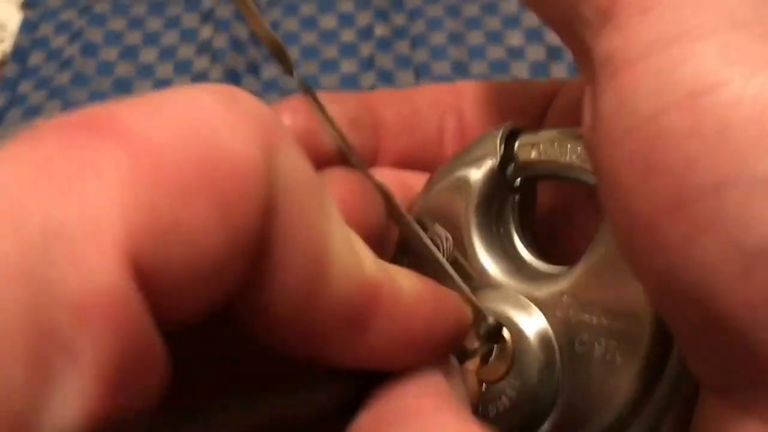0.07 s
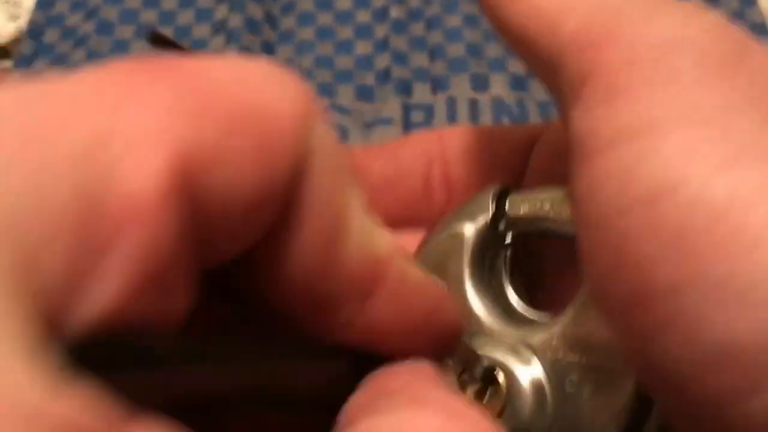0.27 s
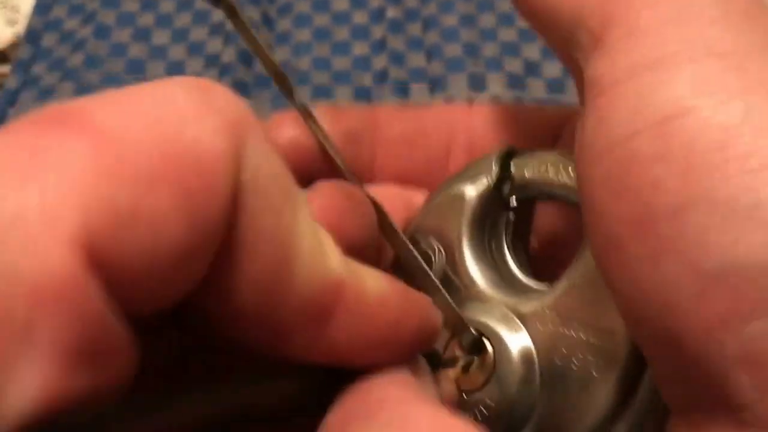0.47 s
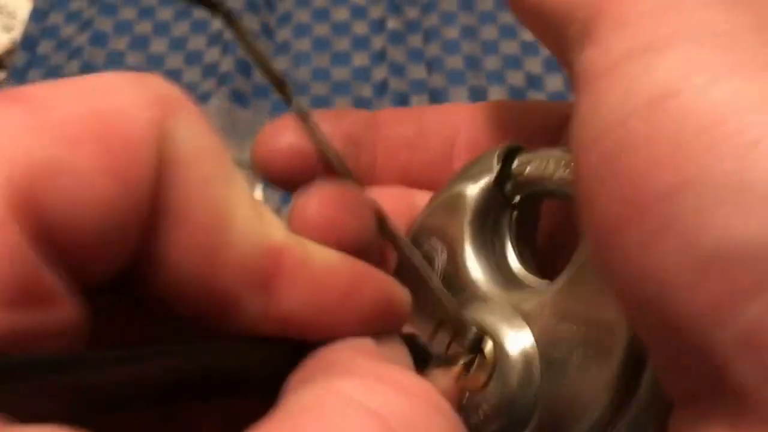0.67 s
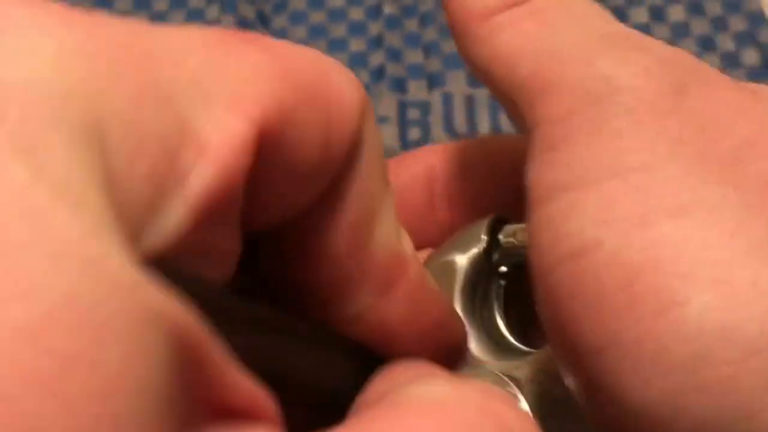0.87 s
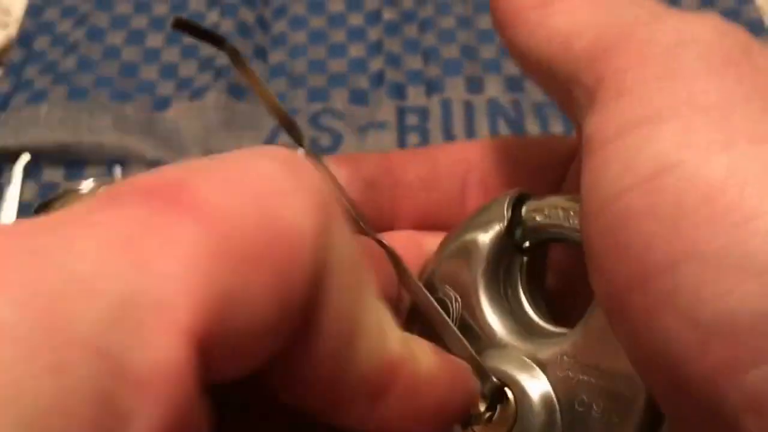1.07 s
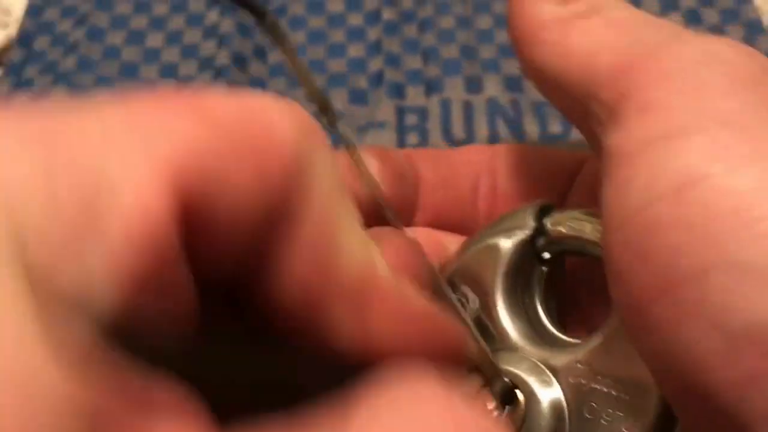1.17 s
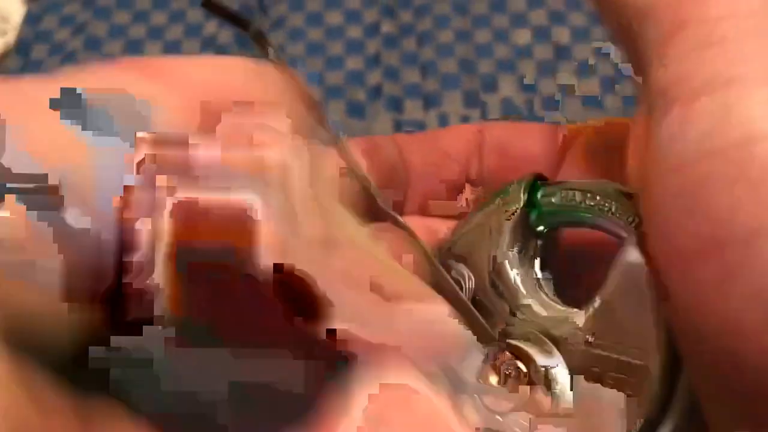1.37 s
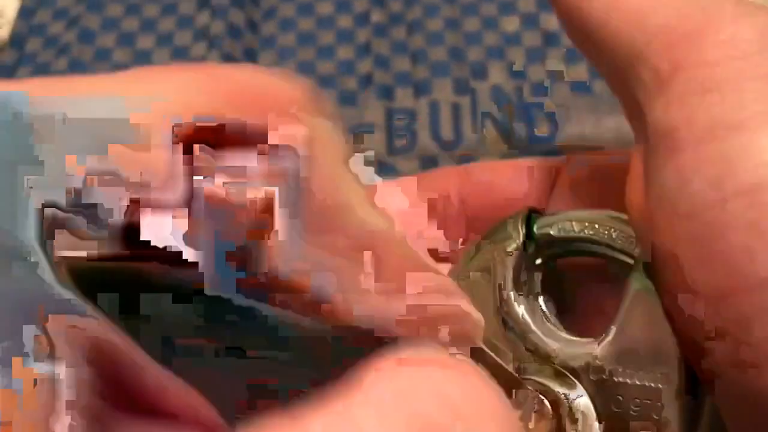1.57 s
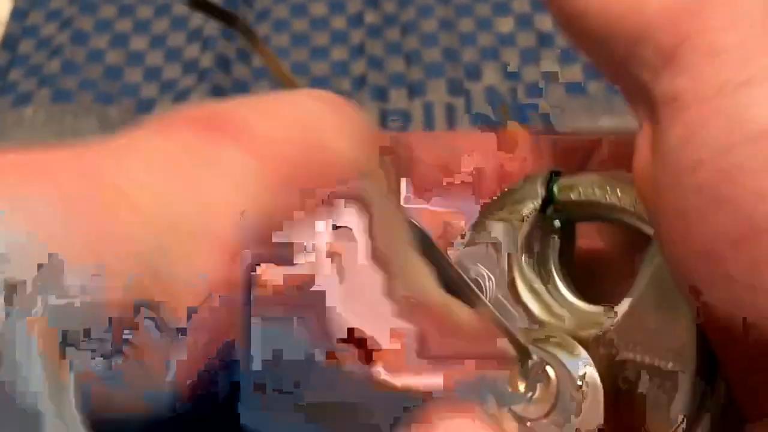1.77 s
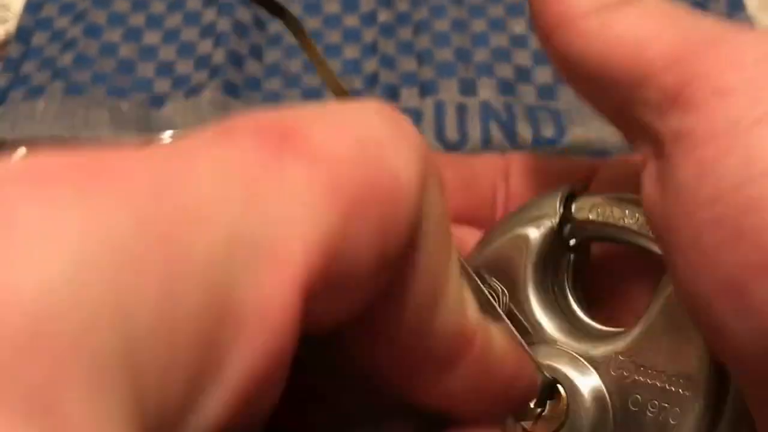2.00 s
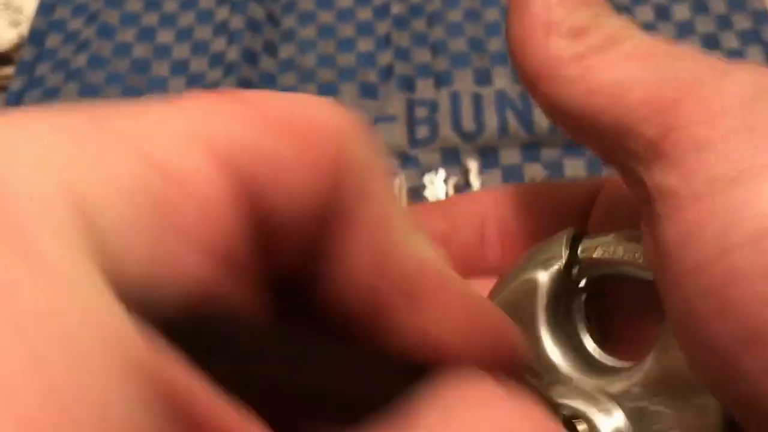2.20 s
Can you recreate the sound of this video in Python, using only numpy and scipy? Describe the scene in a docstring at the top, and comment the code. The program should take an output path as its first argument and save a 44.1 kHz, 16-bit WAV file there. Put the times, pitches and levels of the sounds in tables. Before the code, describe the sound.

Lock picking in a steel padlock held in the hand: faint ticks first, then louder bunches of dry metal clicks with four sharp snaps, tiny scrapes and soft thumps, very close microphone in a quiet small room.

```python
"""In a small room, a pick is worked back and forth in a steel padlock held in the hand, close to the microphone.
Pins click dryly in quick bunches, made of short noise and contact pulses through damped resonances.
Trains of tiny slips make faint scrapes along the keyway, and the lock thumps softly against the hand.
Four hard snaps ring the thin steel as fluttering sine modes. Shaped noise gives room rumble and hiss,
and a reverb of scattered reflections with a weak tail surrounds the picking."""
import sys
import numpy as np
from scipy import signal
from scipy.fft import rfft, irfft
from scipy.io import wavfile

SR = 44100
rng = np.random.default_rng(int(sys.argv[2]) if len(sys.argv) > 2 else 0)


def pcm_store(signal):
    """Save signal as 16-bit PCM."""
    levels = np.round(np.clip(np.atleast_2d(signal), -1, 1) * 32767)
    wavfile.write(sys.argv[1], SR, levels.astype(np.int16).T)


N = 98739  # length in samples


def amp(db):
    """Turns decibels into gain."""
    return 10 ** (np.asarray(db) / 20)


def unit(x):
    """Scales a sound to rms 1."""
    return x / np.sqrt(np.mean(x ** 2) + 1e-20)


def read(points, hz):
    """Reads a frequency table on a log-frequency axis."""
    table_hz, value = np.transpose(points)
    return np.interp(np.log(hz + 1), np.log(table_hz), value)


def add(mix, start_s, sound):
    """Mixes a sound in at a time."""
    part = mix[max(round(start_s * SR), 0):][:len(sound)]
    part += sound[:len(part)]


def colour(x, points):
    """Multiplies the spectrum by a curve in dB, then scales to rms 1."""
    gain = amp(read(points, np.fft.rfftfreq(len(x), 1 / SR)))
    return unit(irfft(rfft(x) * gain, len(x)))


def resonate(x, hz, width_hz):
    """Applies one resonance twice, for steep skirts."""
    b, a = signal.iirpeak(hz, hz / width_hz, SR)
    once = signal.lfilter(b, a, x)
    return signal.lfilter(b, a, once)


SOFT_HZ = 8330  # the heavy body and the reflections from the hands lose the treble above this


def soften(x):
    """Takes the top treble away with a low-pass."""
    return signal.sosfilt(signal.butter(3, SOFT_HZ, fs=SR, output="sos"), x)


# Spectrum of the low room rumble. Each row: frequency in Hz, relative level in dB per Hz.
RUMBLE_COLOUR = [(20, -49), (50, -5.5), (100, -2.5), (220, -5.5), (450, -10), (900, -24), (2500, -53)]
# Loudness of the rumble. Each row: time in seconds, rms level in dB.
RUMBLE_LEVEL = [(0, -70.5), (.75, -70), (.95, -66.5), (1.3, -65.5), (1.52, -68), (1.8, -67.5)]
# Spectrum of the soft hiss. Each row: frequency in Hz, relative level in dB per Hz.
HISS_COLOUR = [(100, 9), (600, 3), (1100, 3.5), (3300, 2), (7000, -3), (16000, -6.5)]
# Loudness of the hiss. Each row: time in seconds, rms level in dB.
HISS_LEVEL = [(0, -70), (.74, -71), (.89, -68.5), (.92, -60.5), (1.37, -61), (1.388, -73.5), (1.425, -60),
              (1.455, -60.5), (1.85, -61.5), (2.24, -60.5)]


def background():
    """Shaped noise: a low rumble, and a hiss that steps up near 0.9 s and dips briefly near 1.39 s."""
    t = np.arange(N) / SR
    out = np.zeros(N)
    for spectrum, level in ((RUMBLE_COLOUR, RUMBLE_LEVEL), (HISS_COLOUR, HISS_LEVEL)):
        level_db = np.interp(t, *np.transpose(level))
        out += colour(rng.standard_normal(N), spectrum) * amp(level_db)
    return out


# The four resonances of a click: centre Hz, width Hz, decay s, and the share of a wide skirt.
# The body's centre comes from each click.
KNOCK_HZ, KNOCK_WIDTH_HZ, KNOCK_S, KNOCK_SKIRT, KNOCK_SKIRT_WIDTH_HZ = 1114, 524, 0.0011, 0.33, 1660
BODY_WIDTH_HZ, BODY_S, BODY_SKIRT, BODY_SKIRT_WIDTH_HZ = 560, 0.0012, 0.61, 3210
EDGE_HZ, EDGE_WIDTH_HZ, EDGE_S = 7970, 6130, 0.0012
TICK_HZ, TICK_WIDTH_HZ, TICK_S = 12700, 4200, 0.00052
TICK_LOW, TICK_HIGH = 0.655, 1.15  # each click's tick sits at a slightly different pitch, times TICK_HZ
CONTACT = 4.6  # contact pulse against the noise of the rattle
RISE_S = 0.000215  # the click's noise rises softly, and the contact pulse lands at the top
SWELL_DB, SWELL_S = -5, 0.00021  # a faint, very short swell of noise leading into each click
LEAD_S, LEVEL_S = 0.002, 0.0025  # time kept for the swell, and the stretch after it that sets the level
AFTER_DB, AFTER_S = [-6.5, -14.5, -33, -15], 0.0036  # the lock's short after-ring in knock, body, edge, tick


def click(body_hz, levels_db):
    """A contact pulse and a very short rattle of noise excite four heavily damped resonances."""
    time = np.arange(2048) / SR - LEAD_S
    rise = np.clip(time / RISE_S, 0, 1)
    swell = amp(SWELL_DB) * np.exp(-abs(time) / SWELL_S)
    noise = rng.standard_normal((4, len(time))) * np.maximum(rise, swell)
    contact = CONTACT * (np.arange(len(time)) == round((LEAD_S + RISE_S) * SR))

    t = np.maximum(time, 0)
    strikes = []
    for rattle, decay, after_db in zip(noise, (KNOCK_S, BODY_S, EDGE_S, TICK_S), AFTER_DB):
        envelope = np.exp(-t / decay) + amp(after_db) * np.exp(-t / AFTER_S)
        strikes.append(rattle * envelope + contact)
    knock, body, edge, tick = strikes

    knock_skirt = KNOCK_SKIRT * resonate(knock, KNOCK_HZ, KNOCK_SKIRT_WIDTH_HZ)
    body_skirt = BODY_SKIRT * resonate(body, body_hz, BODY_SKIRT_WIDTH_HZ)
    tick_hz = TICK_HZ * rng.uniform(TICK_LOW, TICK_HIGH)
    parts = [resonate(knock, KNOCK_HZ, KNOCK_WIDTH_HZ) + knock_skirt,
             soften(resonate(body, body_hz, BODY_WIDTH_HZ) + body_skirt),
             resonate(edge, EDGE_HZ, EDGE_WIDTH_HZ),
             resonate(tick, tick_hz, TICK_WIDTH_HZ)]
    out = np.zeros(len(t))
    for part, db in zip(parts, levels_db):
        head = part[round(LEAD_S * SR):][:round(LEVEL_S * SR)]
        out += amp(db) * part / head.std()
    return out


# The pick striking pins, levels ahead of the case. Each row: start in seconds, body pitch in Hz,
# dull knock in dB, body in dB, bright edge in dB, thin tick in dB.
PIN_CLICKS = [(0.0222, 2680, -53.5, -46, -54, -52), (0.109, 3100, -46.5, -50.5, -67, -69),
              (0.2228, 4200, -53.5, -47, -57, -78), (0.2657, 2980, -52, -51.5, -60, -67),
              (0.271, 3600, -57, -50.5, -67, -56), (0.3367, 4580, -61, -49, -45, -47),
              (0.4423, 5500, -50, -44, -57, -45.5), (0.445, 3880, -76, -38, -40.5, -45.5),
              (0.6096, 2940, -58, -45, -64, -56), (0.6146, 3070, -57.5, -35.5, -43.5, -50.5),
              (0.7613, 2800, -52.5, -38, -35, -54), (0.8092, 3380, -54, -21.5, -60, -53),
              (0.8304, 3900, -79, -37, -42, -65), (0.8984, 3200, -47, -27, -27.5, -37),
              (0.903, 3640, -32.5, -45, -40, -26.5), (0.9124, 3380, -35.5, -25, -40.5, -57.0),
              (0.922, 3970, -46, -29.5, -26, -47), (0.9748, 2060, -51, -34, -37, -27),
              (1.1169, 4200, -47, -35, -41, -37.5), (1.1201, 5600, -44.5, -38, -35, -45),
              (1.1248, 4400, -45, -27, -40, -56), (1.13, 3120, -43.5, -25.5, -22.5, -53),
              (1.1345, 4200, -42, -26.5, -25, -54), (1.1383, 4310, -47, -29, -30.5, -54),
              (1.1451, 3050, -49.5, -34.5, -35, -62.0), (1.3244, 3370, -64, -66, -48, -60),
              (1.3392, 4000, -48, -43.5, -50.5, -56), (1.4219, 4130, -56, -44, -54, -68),
              (1.438, 3640, -51.5, -45, -40, -30.5), (1.4507, 3760, -44, -24.5, -43, -58),
              (1.4525, 4540, -40.5, -21.5, -21, -43), (1.4558, 4420, -59, -24.5, -30, -37),
              (1.5683, 4100, -55.5, -49.5, -38.5, -50), (1.6357, 3670, -56, -45.5, -56, -65),
              (1.6539, 3420, -42, -34, -33.5, -22.5), (1.6716, 4380, -62, -33, -38.5, -58),
              (1.7458, 3150, -57, -42.5, -51, -66), (1.7733, 4080, -35, -29.5, -29.0, -18.5),
              (1.7824, 4340, -58, -28.5, -36, -41), (1.783, 4390, -38, -19, -22, -29),
              (1.807, 2950, -43.5, -34.0, -37, -71), (2.057, 3760, -46.5, -42.5, -58, -43.5),
              (2.065, 4200, -53, -44.5, -44.5, -35.5), (2.0858, 2760, -56, -45.5, -69, -66.0),
              (2.1985, 4350, -62, -47.5, -48.5, -55.5), (2.22, 4450, -47.5, -28.5, -35, -51),
              (2.2283, 3420, -49.5, -33, -39, -66), (2.2332, 4170, -42, -36, -28, -26)]


def pins():
    """The pick strikes the pins, one damped click for each contact."""
    out = np.zeros(N)
    for start_s, body_hz, *levels_db in PIN_CLICKS:
        add(out, start_s - LEAD_S, click(body_hz, levels_db))
    return out


# Peaks and hollows of the lock's case, shared by all clicks and scrapes.
# Each row: frequency in Hz, gain in dB.
CASE_COLOUR = [(1300, -1.5), (1900, 0.5), (4500, 1), (5200, -1), (6000, 0.5), (7300, -1.5), (8500, 0),
               (9500, -0.5), (10500, -8), (12000, 3), (14400, -2), (15400, 3.5)]


def case(x):
    """The steel case colours every contact by a minimum-phase filter, so no sound comes ahead of it."""
    log_gain = np.log(amp(read(CASE_COLOUR, abs(np.fft.fftfreq(2048, 1 / SR)))))
    spectrum = np.exp(np.conj(signal.hilbert(log_gain)))
    return signal.fftconvolve(x, np.fft.ifft(spectrum).real)[:N]


# How long the room's tail lasts. Each row: frequency in Hz, time to fall 60 dB in seconds.
ROOM_T60 = [(1500, 0.08), (4500, 0.25), (14000, 0.35)]
# Colour of the room's tail. Each row: frequency in Hz, relative level in dB.
TAIL_COLOUR = [(1000, 6.5), (4200, 0), (5200, -20), (6000, 3), (7200, -9), (9000, -3), (12000, -12)]
TAIL_DB, EARLY_DB, EARLY_S = -23.5, -19.5, 0.014  # energy of tail and reflections, reflections' decay


def room(x):
    """Quick reflections from hands and table, with a weak noise tail whose bass dies first."""
    t = np.arange(SR // 2) / SR
    hz, frames, bins = signal.stft(rng.standard_normal(len(t)), SR, nperseg=256)
    fall_db = 60 * frames / read(ROOM_T60, hz)[:, None]
    fade = amp(read(TAIL_COLOUR, hz)[:, None] - fall_db)
    tail = signal.istft(bins * fade, SR, nperseg=256)[1][:len(t)]
    tail = tail * np.minimum(t / 0.005, 1)

    hits = rng.random(len(t)) < 2000 / SR  # 2000 reflections a second on average
    early = rng.standard_normal(len(t)) * hits * np.exp(-t / EARLY_S) * (t > 0.001)
    early = soften(early)

    echo = amp(TAIL_DB) * tail / np.linalg.norm(tail)
    echo = echo + amp(EARLY_DB) * early / np.linalg.norm(early)
    return signal.fftconvolve(x, echo)[:N]


# The pick dragging in the keyway, levels ahead of the case.
# Each row: start in seconds, length in seconds, rms level in dB, resonance in Hz.
KEYWAY_SCRAPES = [(0.076, 0.024, -61, 3140), (0.203, 0.011, -48.5, 2240), (0.369, 0.032, -62.5, 3400),
                  (0.776, 0.03, -51.5, 3060), (0.814, 0.04, -56.5, 3340), (1.295, 0.011, -50, 980),
                  (1.308, 0.014, -54.5, 4340), (1.641, 0.012, -48, 3100), (1.907, 0.035, -53.5, 2730)]
# Spectrum of the dragging. Each row: frequency in Hz, relative level in dB.
DRAG_COLOUR = [(300, -2), (1000, 4.5), (3500, 4), (6000, -0.5), (16000, -12.5)]
SLIPS_PER_S, SLIP_SPREAD_DB = 1500, 6
SCRAPE_WIDTH_HZ, SCRAPE_RING = 900, 0.55  # the stirred resonance and its share against the drag


def scrapes():
    """Dense tiny slips of uneven size swell and fade as the pick drags, stirring one resonance of the lock."""
    out = np.zeros(N)
    for start_s, length_s, db, hz in KEYWAY_SCRAPES:
        n = round(length_s * SR)
        moments = rng.random(n) < SLIPS_PER_S / SR
        sizes = amp(SLIP_SPREAD_DB * rng.standard_normal(n))
        slips = moments * sizes * rng.choice([-1, 1], n)
        resonance = unit(resonate(slips, hz, SCRAPE_WIDTH_HZ))
        drag = colour(slips, DRAG_COLOUR) + SCRAPE_RING * resonance
        swell = np.sin(np.pi * np.arange(n) / n) ** 0.5
        add(out, start_s, amp(db) * unit(drag * swell))
    return out


# Soft knocks of the lock against the hand.
# Each row: start in seconds, frequency in Hz, level in dB, decay in seconds.
HAND_THUMPS = [(0.449, 71, -50.5, 0.017), (0.463, 508, -52, 0.0064), (0.6, 90, -44, 0.0073),
               (0.81, 74, -38.5, 0.0092), (0.904, 68, -34.5, 0.0074), (1.115, 67, -43.5, 0.012),
               (1.439, 65, -42, 0.0089), (1.456, 508, -53.5, 0.013)]


def thumps():
    """The lock rocks against the hand: a short decaying sine that rises over its first cycle."""
    out = np.zeros(N)
    t = np.arange(SR // 6) / SR
    for start_s, hz, db, decay in HAND_THUMPS:
        envelope = np.minimum(t * hz, 1) * np.exp(-t / decay)
        add(out, start_s, amp(db) * envelope * np.sin(2 * np.pi * hz * t))
    return out


BUZZ, BUZZ_HZ = 0.3, 130  # depth and top speed of the ring's flutter as the steel chatters in the keyway


def ring(modes, t):
    """Sums decaying sine modes, each fluttering on its own by slow noise in level and phase."""
    out = np.zeros(len(t))
    slow = signal.butter(2, BUZZ_HZ, fs=SR, output="sos")
    for hz, db, t60 in modes:
        in_phase, across = signal.sosfilt(slow, rng.standard_normal((2, len(t))))
        phase = 2 * np.pi * (hz * t + rng.random())
        wave = (1 + BUZZ * unit(in_phase)) * np.sin(phase) + BUZZ * unit(across) * np.cos(phase)
        out += amp(db - 60 * t / t60) * wave
    return out


# Snaps that ring the steel. Each row: start in seconds, tension tool level in dB, pick level in dB,
# time in seconds until it is pressed still again.
STEEL_SNAPS = [(0.9028, -33, -44, .016), (1.1305, -27.5, -21, 0.013), (1.452, -24, -29, 0.0053),
               (1.7844, -20.5, -28, .05)]
# Modes of the tension tool ringing free.
# Each row: frequency in Hz, relative level in dB, time to fall 60 dB in seconds.
TOOL_MODES = [(4370, -2.5, .027), (6627, -2, .052), (9925, -7, .03), (10085, -8, .07), (13660, -15, .06)]
# Modes of the pick. Each row: frequency in Hz, relative level in dB.
PICK_MODES = [(2800, -4), (3400, -1.5), (4170, -6.5), (5780, -1.5), (6050, -6), (10120, -23)]
PICK_T60_S, DAMPED_S = 0.026, 0.0065  # the pick's free ring, and the added decay once pressed still


def tool():
    """Tension tool and pick ring after a hard snap until they are pressed still."""
    out = np.zeros(N)
    t = np.arange(SR // 5) / SR
    pick_modes = [(hz, db, PICK_T60_S) for hz, db in PICK_MODES]
    for start_s, tool_db, pick_db, free_s in STEEL_SNAPS:
        steel = amp(tool_db) * ring(TOOL_MODES, t) + amp(pick_db) * ring(pick_modes, t)
        damping = np.exp(-np.maximum(t - free_s, 0) / DAMPED_S)
        add(out, start_s, steel * damping)
    return out


STEEL_ROOM = 0.45  # share of the ring of tension tool and pick that reaches the room


def scene():
    """Sets the lock in its room, with the case colouring clicks and scrapes."""
    picking = case(pins() + scrapes())
    steel = tool()
    echoes = room(picking + STEEL_ROOM * steel)
    return (picking + steel + echoes + thumps() + background())[None]


CUT_HZ = 16100


def record(dry):
    """The recorder's band limit, a steep linear-phase low-pass."""
    low_pass = signal.firwin(201, CUT_HZ, window=("kaiser", 8), fs=SR)
    return signal.oaconvolve(dry, low_pass[None], "same")


dry = scene()
out = record(dry)
pcm_store(out)
```